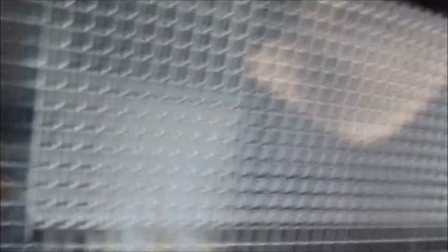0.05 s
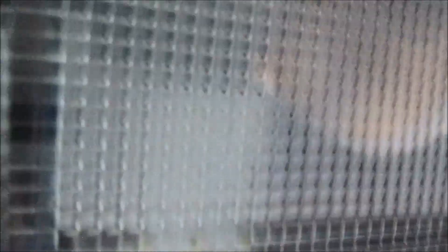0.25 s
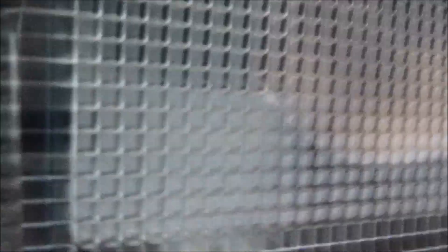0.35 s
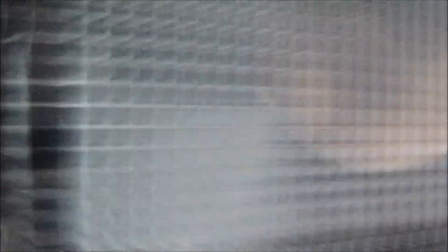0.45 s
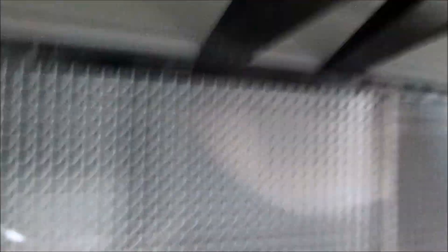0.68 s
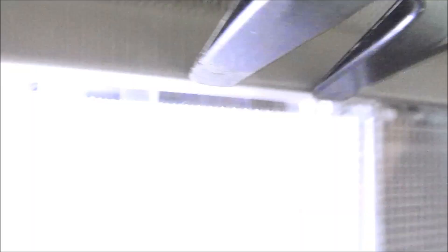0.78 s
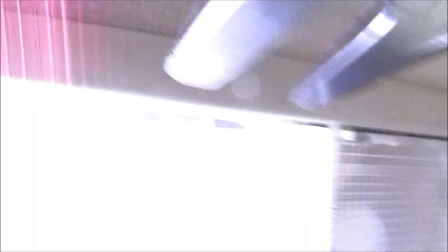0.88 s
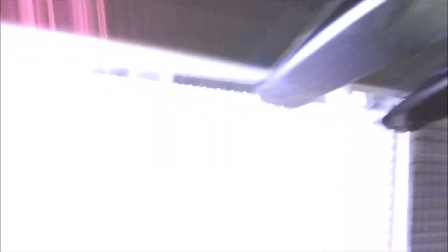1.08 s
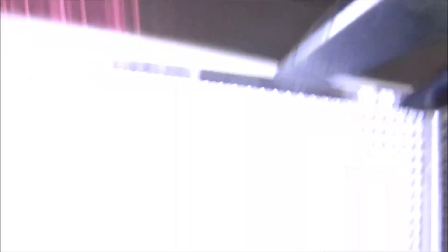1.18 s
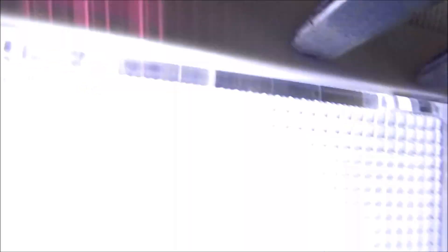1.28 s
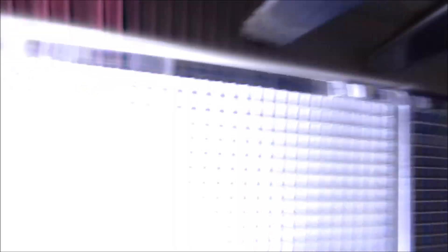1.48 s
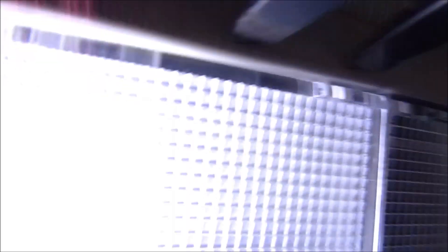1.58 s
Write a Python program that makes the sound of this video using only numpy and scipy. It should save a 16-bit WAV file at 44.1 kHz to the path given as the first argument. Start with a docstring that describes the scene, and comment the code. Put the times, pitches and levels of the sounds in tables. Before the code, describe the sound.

Loud plastic snaps, then lighter clicks, as a car's ceiling light cover is pressed.

```python
"""Fingers press the plastic cover of a car's ceiling light, close by, over faint hiss and cabin rumble.
Two light clicks come first; from 0.23 to 0.31 s follow loud snaps that overload the recorder.
Each slip of the plastic is an impulse: the cover rings and rattles, its housing thuds, and the small
padded cabin answers with a short low boom. Another sharp snap falls at 0.7 s, then lighter clicks run
on until 1.4 s. Soft rustles lie between them, and a last one closes the scene."""
import sys
import numpy as np
from scipy import signal
from scipy.fft import rfft, irfft
from scipy.io import wavfile
from scipy.ndimage import uniform_filter1d

SR = 44100
rng = np.random.default_rng(int(sys.argv[2]) if len(sys.argv) > 2 else 0)


def dump(signal):
    """Clip the signal to [-1, 1] and save it as 16-bit WAV at the path in sys.argv[1]."""
    limited = np.clip(np.atleast_2d(signal).T, -1, 1)
    pcm = np.round(limited * 32767).astype(np.int16)
    wavfile.write(sys.argv[1], SR, pcm)


N = 72765

# Spectra of the background. Each row: frequency in Hz, relative spectral density in dB.
HISS_SPECTRUM = [(200, -23), (433, 1.5), (760, -5), (1500, 0.5), (2450, 1), (3000, -3), (4500, -9.5),
                 (5500, -5), (7200, -16.5), (10400, -16), (16000, -21.5)]
RUMBLE_SPECTRUM = [(20, -16), (50, -8), (80, -4), (116, 7), (160, -8.5), (450, -9.5), (900, -19),
                   (3000, -60.5)]
# Envelopes of the background. Each row: time in seconds, level in dB.
HISS_ENVELOPE = [(.22, -52.5), (0.309, -59), (0.621, -66), (0.801, -57.5), (1.078, -64), (1.2, -58),
                 (1.398, -58), (1.5, -53), (1.65, -54)]
RUMBLE_ENVELOPE = [(0, -47.5), (0.2, -48), (.42, -49.5), (0.481, -56.5), (.62, -61.5), (0.799, -48.5),
                   (1.05, -58.5), (1.65, -59.5)]
# Coherence of the sound field. Each row: frequency in Hz, left-right correlation from 0 to 1.
COHERENCE = [(60, 1), (300, 0.91), (700, 0.3), (2000, 0.1), (6000, 0.019)]
# Balance of rustles, rattle and reverberation. Each row: frequency in Hz, left minus right in dB.
BALANCE = [(2000, -1.5), (4500, -1.5), (8000, -9), (16000, -5.5)]
# Soft rustles. Each row: start and length in seconds, then low, middle and treble gain in dB.
RUSTLE_EVENTS = [(0.165, 0.02, -39.5, -54.5, -56.5), (0.237, 0.035, -27, -39.5, -52),
                 (0.497, 0.03, -42.5, -58.5, -69.5), (0.643, 0.026, -36, -45.5, -65.5),
                 (0.667, 0.028, -50, -35.5, -66.5), (0.7, 0.068, -45.5, -47.5, -66.5),
                 (0.84, 0.059, -44, -59.5, -71), (1.126, 0.053, -47.5, -52.5, -68),
                 (1.632, .03, -33, -66.5, -63)]
RUSTLE_BANDS_HZ = (400, 2200, 8000)
# Spectrum common to all rustles. Each row: frequency in Hz, gain in dB.
RUSTLE_SPECTRUM = [(50, -59.5), (200, 9), (500, 13.5), (2300, 15.5), (3800, 5), (8000, 13.5), (13000, 3.5),
                   (16000, -22.5)]
# Diffuse decays. Each row: frequency in Hz, gain in dB, 60 dB decay time (t60) in seconds.
CABIN_REVERB = [(60, -7, .12), (131, -1, 0.21), (300, -14.5, 0.1), (1230, -19, 0.061), (2400, -24.5, 0.056),
                (12000, -44.5, .04)]
PLASTIC_RATTLE = [(120, -7.5, 0.12), (580, -5, 0.012), (1150, -12.5, .022), (2185, -9, 0.0069),
                  (4100, -13, 0.014), (9300, -10.5, 0.0055), (15800, -19, .0026)]
# Lingering modes of cabin air and lamp housing. Each row: frequency in Hz, t60 in seconds, gain in dB.
BOOM_MODES = [(99.3, .22, 7.5), (132.7, 0.35, 11.5), (374, 0.19, -2), (530, 0.25, -7)]
# Modes of cover and housing. Each row: frequency in Hz, t60 in seconds, left and right gain in dB.
COVER_MODES = [(322, 0.038, -4, -2.5), (512, 0.02, -1, -3.5), (653.5, 0.047, 0.5, -2),
               (936, 0.024, -6, -2.5), (1313, 0.019, -9.5, -14), (1856, 0.011, -7, -0.5),
               (2195, 0.011, -2, -5), (2610, 0.0046, -7.5, -3), (3600, 0.0048, -10, -15),
               (4500, 0.0035, -15, -15), (6080, .004, -17, -4), (8500, 0.00076, -28, -15.5)]
# Slips of the plastic; two rows starting a fraction of a millisecond apart make one slip ringing at two
# pitches. Each row: start in seconds, pitch of the struck spot in Hz, six band gains in dB (boom, thud, body,
# ring, edge, treble), left minus right in dB.
CLICK_EVENTS = [ (0.0586, 317, 12, 13, 0.5, -6, -12, -26.5, 2),
                (0.0724, 680, 3, 13, 1.5, 3, -10, -15.5, 1.5),
                (0.2336, 2150, 12.5, 20, 28, 27.5, 17, 4, -2), (0.2338, 520, 23.5, 23, 31.5, -7, 10, 0, 1),
                (.2407, 540, -18.5, 6, 19.5, 9.5, 6, -9, -7), (.255, 880, 9.5, 21.5, 22.5, 13.5, 8, -18, 3),
                (.301, 426, 24, 26.5, 15, 12, 0, -8, -1.5),
                (0.3052, 3650, 19, 14.5, 20.5, 28.5, 19, 17.5, 1),
                (.307, 660, -2, 15.5, 22, 21.5, 10, -3, 5.5), (.503, 313, 2, 3.5, -3, -17, -38, -42, 2.5),
                (0.5138, 1790, -7, -11, 2, -3.5, 0, -14, 3),
                (.562, 697, -16.5, -21, -13.5, -15, -21, -42.5, 1.5),
                (0.6977, 2590, 14, 15.5, 19, 25, 15.5, 12.5, 2.5),
                (0.7747, 720, -16, -10, -6.5, -3, -10, -41, 0), (0.7863, 720, -8.5, 3, 3, -2, -3, -11.5, 1),
                (.874, 543, -12.5, 10, -1.5, -6, -13, -41, 2.5),
                (.885, 388, -6.5, 6.5, -0.5, -7.5, -18, -25.5, 4),
                (1.0381, 456, -5, 15.5, 16.5, 3, 2, -3.5, 0.5),
                (1.0545, 2410, -11, -4, 9.5, 5.5, -10.5, -26.5, -0.5),
                (1.108, 1110, 5.5, 14.5, 5, 4, -5, -14, 3), (1.1131, 980, 1, 12.5, 19, 15, 3, -13, 0),
                (1.1408, 1740, -28, -7, 2, 6.5, 1, -14.5, 1),
                (1.2314, 2080, -21, 13.5, 5, 4.5, -4.5, -29, -2.5),
                (1.2976, 286, 12, 18, -1, -7.5, -7, -15.5, 0),
                (1.3804, 1930, -0.5, 4.5, 6, 18, 12, -7.5, 4.5),
                (1.3809, 587, 10, 10, 12.5, -9, -3, -19, -4)]
CLICK_BANDS_HZ = (120, 280, 650, 2200, 4200, 9000)


def amp(db):
    """Amplitude ratio: a factor of ten for every 20 dB."""
    return 10 ** (np.asarray(db) / 20)


def unit_rms(x):
    """Normalisation to unit mean power."""
    return x / np.sqrt(np.mean(x ** 2) + 1e-20)


def curve_at(points, hz):
    """Interpolation of (Hz, value) points on a logarithmic frequency axis."""
    knots_hz, values = np.transpose(points)
    return np.interp(np.log(hz + 1), np.log(knots_hz + 1), values)


def add(mix, start_s, sound):
    """Superposition: a stereo sound adds to the mix from its start time."""
    part = mix[:, round(start_s * SR):][:, :sound.shape[1]]
    part += sound[:, :part.shape[1]]


def colour(x, points, size=2048):
    """Minimum-phase filtering: the gain follows (Hz, dB) points and the response is causal."""
    log_gain = np.log(amp(curve_at(points, abs(np.fft.fftfreq(size, 1 / SR)))))
    response = np.exp(np.conj(signal.hilbert(log_gain)))
    taps = np.fft.ifft(response).real[:size // 2]
    return signal.fftconvolve(x, taps[None], axes=1)[:, :x.shape[1]]


def stereo_noise(size, leaning=True):
    """Partial coherence: the sides are alike in the bass; if leaning, the treble favours the right."""
    hz = np.fft.rfftfreq(size, 1 / SR)
    left, independent = rfft(rng.standard_normal((2, size)))
    coherence = np.clip(curve_at(COHERENCE, hz), -1, 1)
    right = coherence * left + np.sqrt(1 - coherence ** 2) * independent
    lean = amp(curve_at(BALANCE, hz) / 2 * leaning)
    return irfft(np.array([left * lean, right / lean]), size)


def background(spectrum, envelope, patch_db=3.5):
    """Modulated noise: hiss or rumble flickers in spectral patches under a slow envelope."""
    hz, _, frames = signal.stft(stereo_noise(N, leaning=False), SR, nperseg=2048)
    patches = unit_rms(uniform_filter1d(rng.standard_normal(frames.shape), size=12, axis=0))
    gain = amp(curve_at(spectrum, hz)[:, None] + patch_db * patches)
    shaped = signal.istft(frames * gain, SR, nperseg=2048)[1][:, :N]
    level_db = np.interp(np.arange(N) / SR, *np.transpose(envelope))
    return unit_rms(shaped) * amp(level_db)


def rustle(length_s, band_db, ramp_s=0.0045, grain_db=2, size=8192):
    """Random amplitude modulation gives a short burst of noise its grain."""
    t = np.arange(size) / SR
    flicker = unit_rms(uniform_filter1d(rng.standard_normal(size), size=60))
    gate = np.clip(np.minimum(t, length_s - t) / ramp_s, 0, 1)
    burst = unit_rms(stereo_noise(size) * amp(grain_db * flicker)) * gate
    return colour(colour(burst, RUSTLE_SPECTRUM), list(zip(RUSTLE_BANDS_HZ, band_db)))


def diffuse_decay(bands, t):
    """Modal overlap: dense resonances merge into noise, each band dying at its own rate."""
    hz = np.fft.rfftfreq(len(t), 1 / SR)
    spectrum = rfft(stereo_noise(len(t)))
    centres_hz = [row[0] for row in bands]
    sound = 0
    for (_, db, t60), weights in zip(bands, np.eye(len(bands))):
        share = curve_at(list(zip(centres_hz, weights)), hz)
        attack = np.minimum(20 * t / t60, 1)
        envelope = attack * np.exp(-np.log(1000) * t / t60)
        sound += amp(db) * irfft(spectrum * share, len(t)) * envelope / np.linalg.norm(envelope)
    return sound


def mode(hz, t60, t, wave=np.sin):
    """Impulse response of a damped oscillator with unit gain at resonance."""
    damping = np.log(1000) / t60
    return 2 * damping / SR * np.exp(-damping * t) * wave(2 * np.pi * hz * t)


def cabin_boom(t, rise_s=0.022):
    """Resonance: the low modes of cabin air and lamp housing swell, then linger."""
    swell = 1 - np.exp(-(t / rise_s) ** 2)
    return swell * sum(amp(db) * mode(hz, t60, t) for hz, t60, db in BOOM_MODES)


def cover_ring(t, detune_share=0.015, left_delay_s=0.00011):
    """Free vibration: the cover's modes sum with alternating sign, shifting as the fingers move."""
    since_arrival = np.maximum(t - np.array([[left_delay_s], [0]]), 0)
    detune = 1 + detune_share * rng.standard_normal(len(COVER_MODES))
    return sum((-1) ** k * amp([[left_db], [right_db]]) * mode(hz * detune[k], t60, since_arrival)
               for k, (hz, t60, left_db, right_db) in enumerate(COVER_MODES))


def click(spot_hz, band_db, pan_db, spot_db=1, spot_cycles=9, low_cut_hz=80, size=12288):
    """Impulse excitation: one slip rings cover and cabin, reinforced at the struck spot's resonance."""
    t = np.arange(size) / SR
    sound = cover_ring(t) + cabin_boom(t)
    sound += diffuse_decay(PLASTIC_RATTLE, t)
    sound += diffuse_decay(CABIN_REVERB, t)
    spot = amp(spot_db) * mode(spot_hz, spot_cycles / spot_hz, t, np.cos)
    sound += signal.fftconvolve(sound, spot[None], axes=1)[:, :size]
    low_cut = signal.butter(2, low_cut_hz, "highpass", fs=SR, output="sos")
    sound = signal.sosfilt(low_cut, sound)
    pan = amp([[pan_db / 2], [-pan_db / 2]])
    return pan * colour(sound, list(zip(CLICK_BANDS_HZ, band_db)))


def scene():
    """Superposition of hiss, cabin rumble, rustles and clicks."""
    hiss = background(HISS_SPECTRUM, HISS_ENVELOPE)
    rumble = background(RUMBLE_SPECTRUM, RUMBLE_ENVELOPE)
    mix = hiss + rumble
    for start_s, length_s, *band_db in RUSTLE_EVENTS:
        add(mix, start_s, rustle(length_s, band_db))
    for start_s, spot_hz, *band_db, pan_db in CLICK_EVENTS:
        add(mix, start_s, click(spot_hz, band_db, pan_db))
    return mix


def record(dry):
    """Saturation flattens the loudest snaps; a low-pass filter then limits the bandwidth."""
    ceiling, cutoff_hz = 0.95, 16100
    saturated = np.clip(dry, -ceiling, ceiling)
    low_pass = signal.firwin(255, cutoff_hz, window=("kaiser", 8), fs=SR)
    return signal.oaconvolve(saturated, low_pass[None], "same")


dry = scene()
out = record(dry)
dump(out)
```